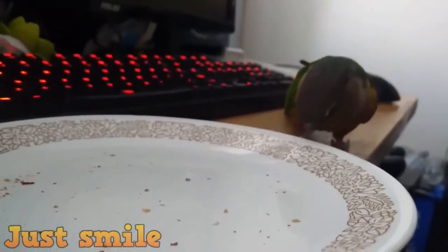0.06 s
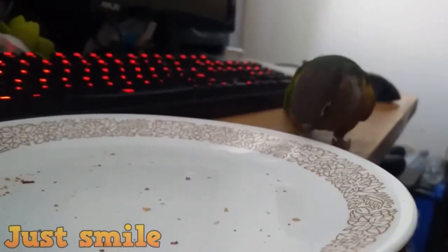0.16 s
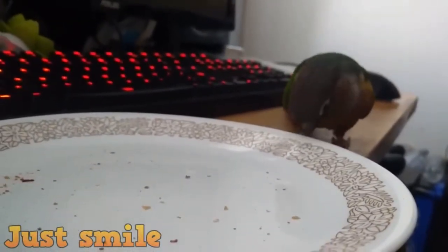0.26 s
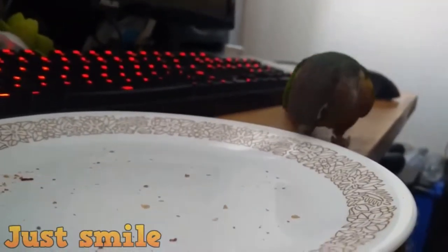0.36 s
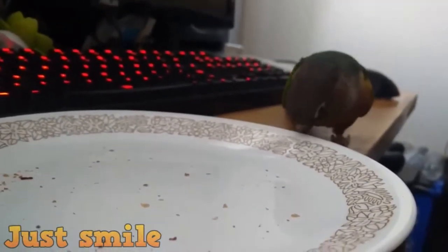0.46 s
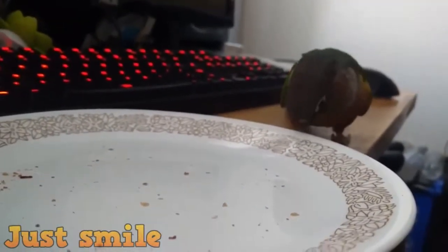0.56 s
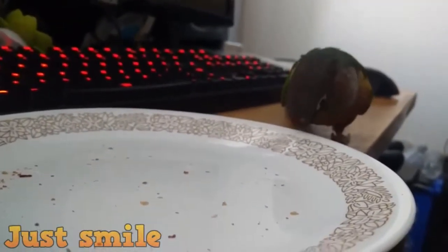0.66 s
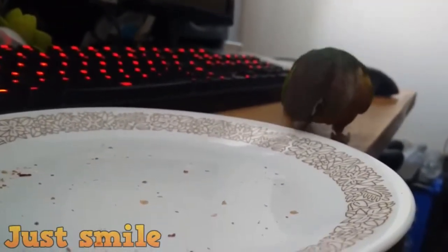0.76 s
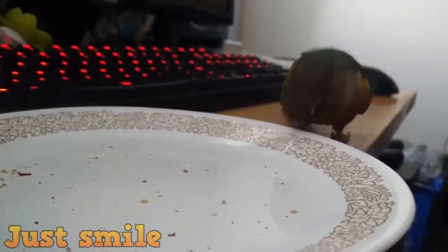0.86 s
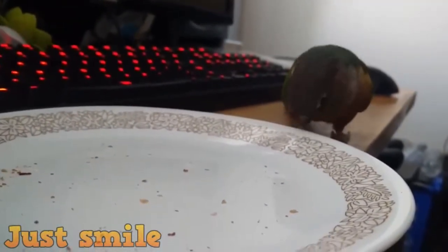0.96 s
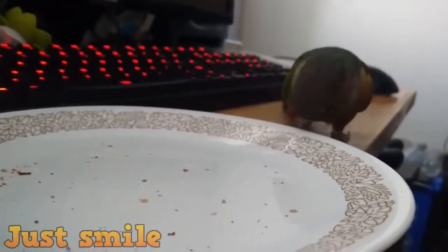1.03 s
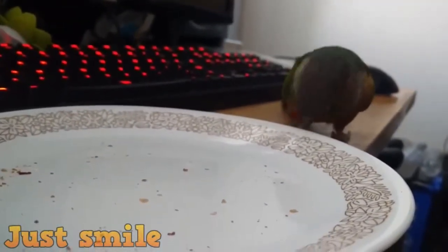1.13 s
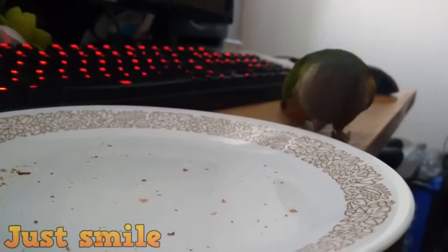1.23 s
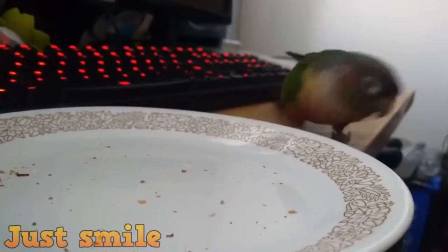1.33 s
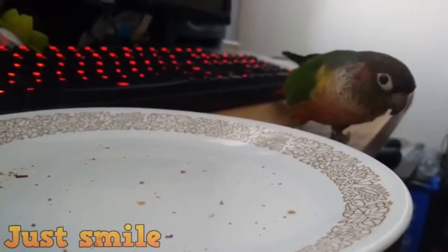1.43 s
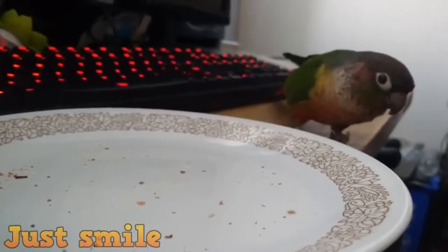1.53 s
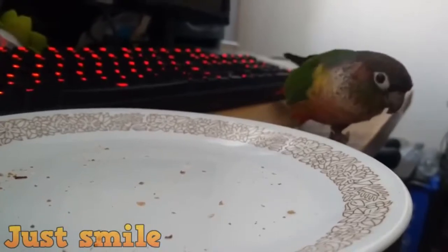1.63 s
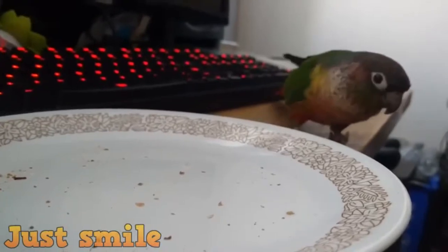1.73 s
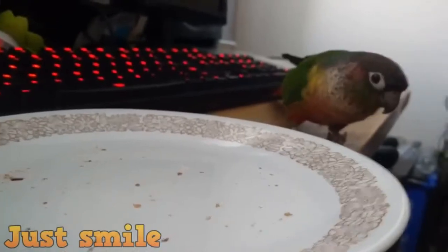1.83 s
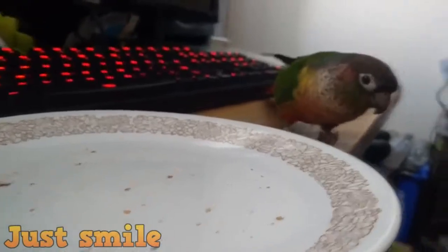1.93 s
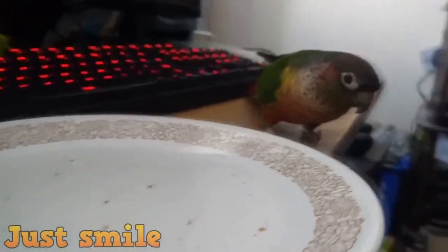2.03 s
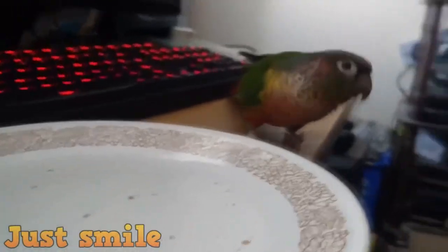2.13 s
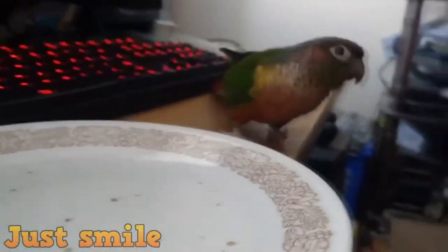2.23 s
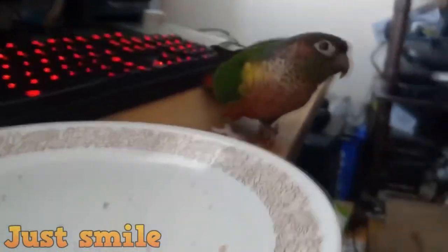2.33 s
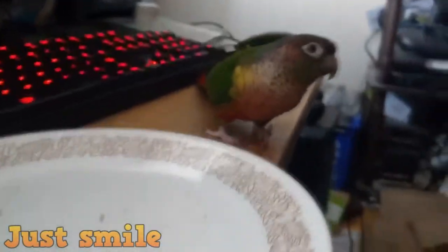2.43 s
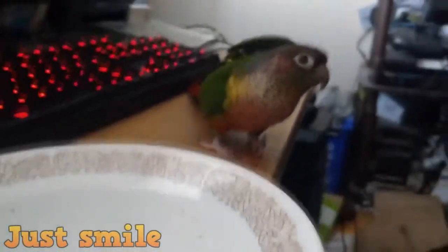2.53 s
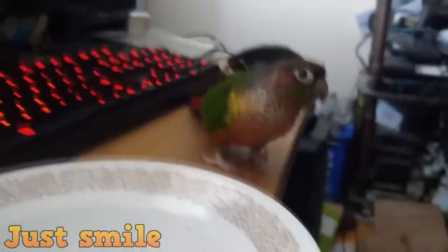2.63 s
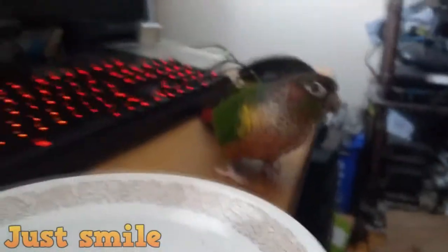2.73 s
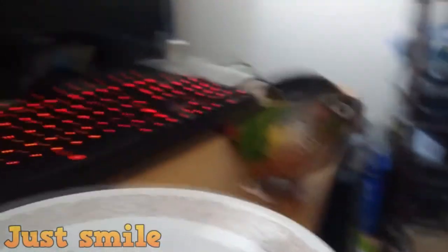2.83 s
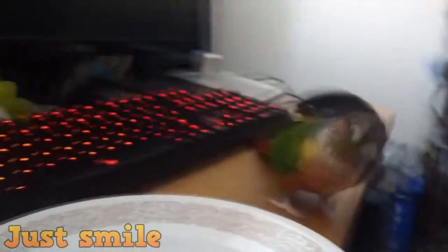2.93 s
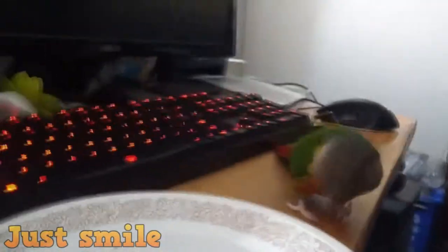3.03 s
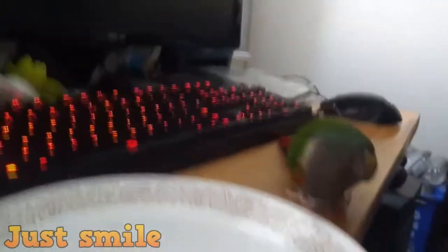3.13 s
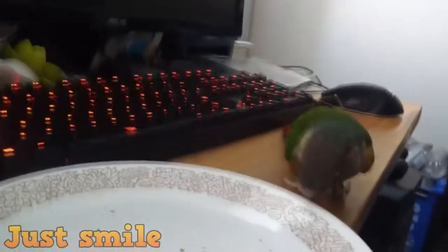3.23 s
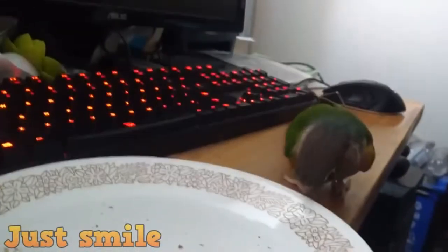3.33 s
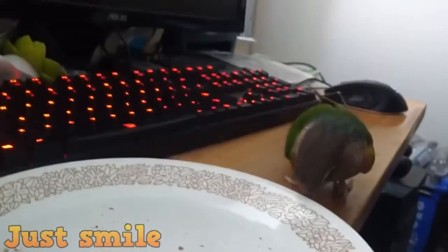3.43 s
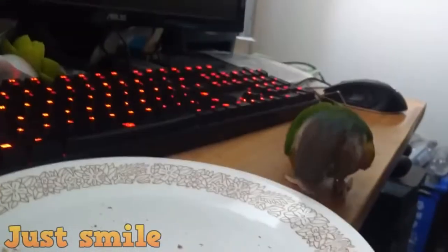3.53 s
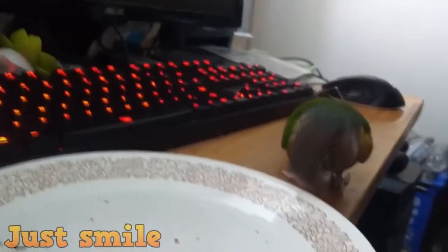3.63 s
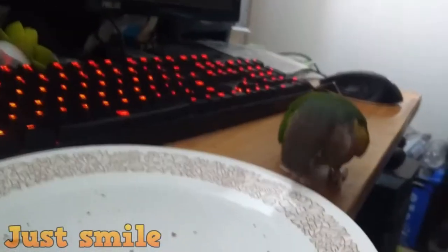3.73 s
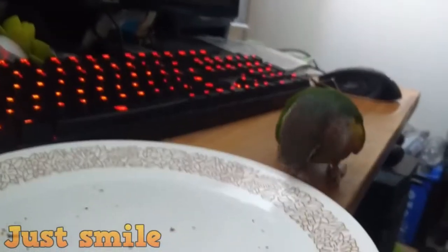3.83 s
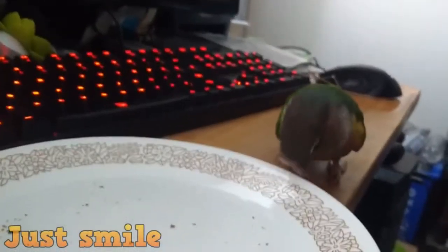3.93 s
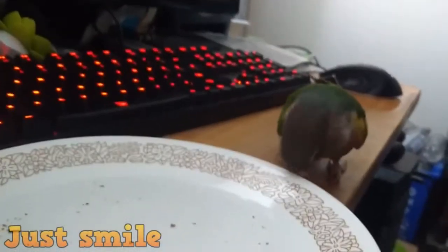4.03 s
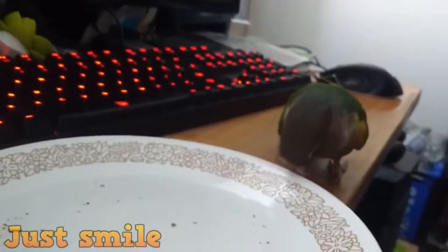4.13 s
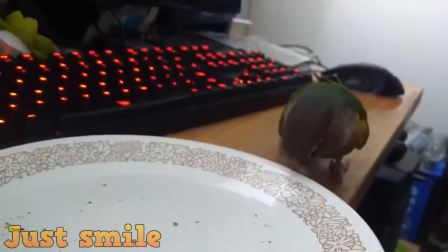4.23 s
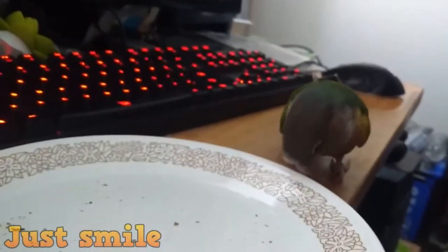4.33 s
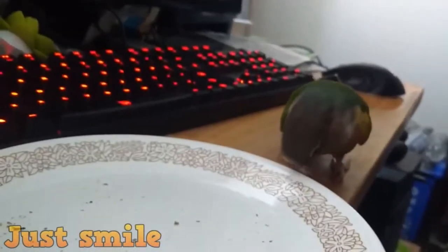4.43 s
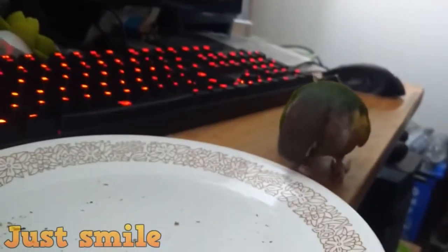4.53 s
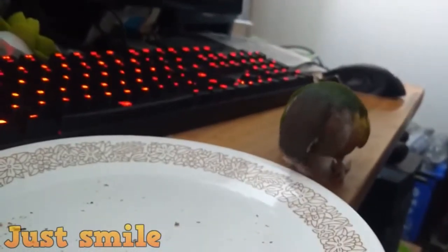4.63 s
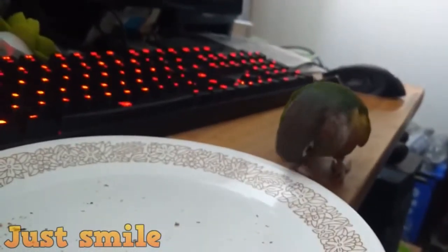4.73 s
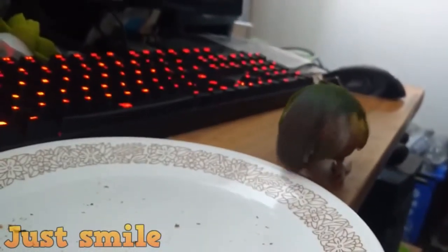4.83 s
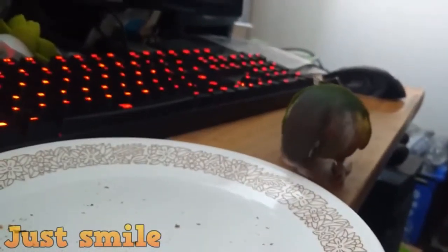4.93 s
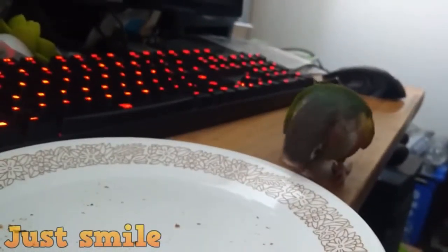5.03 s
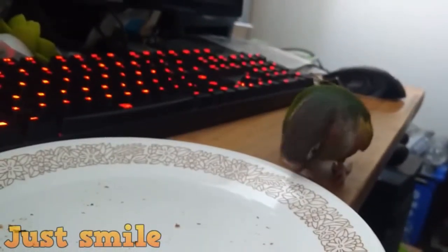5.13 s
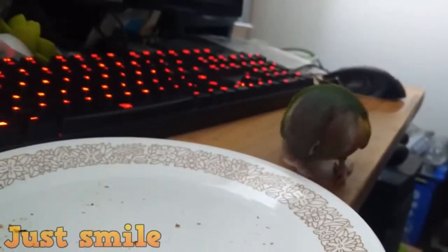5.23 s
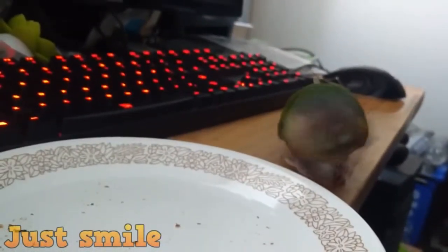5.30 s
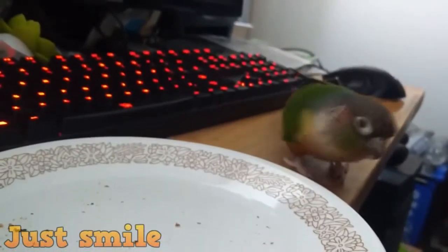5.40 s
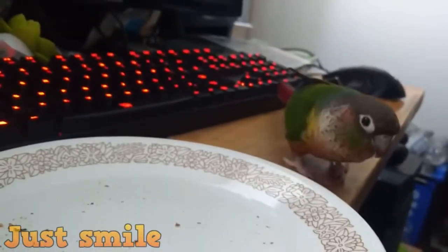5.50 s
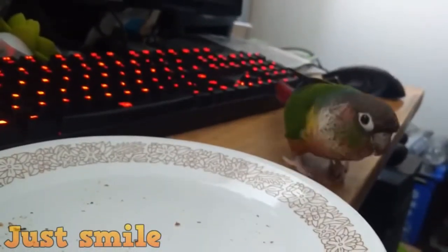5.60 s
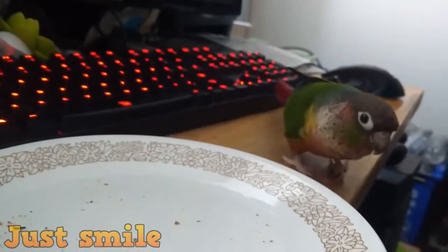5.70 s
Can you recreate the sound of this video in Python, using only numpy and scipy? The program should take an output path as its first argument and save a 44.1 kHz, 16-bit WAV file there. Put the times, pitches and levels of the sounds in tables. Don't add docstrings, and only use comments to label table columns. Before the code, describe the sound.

A small indoor room with computer fans making a steady low hum and soft airy hiss throughout. Close to the phone, a bird's hard beak taps a glazed ceramic plate. The plate is already ringing at 0 s, and about ten taps follow until 1.2 s, roughly eight per second, slightly slowing. Each is a sharp, bright crack with a short dull knock and a high glassy clink; pitch colour and strength vary, and each new tap cuts off the previous ring. After 1.2 s the last ring lingers thin and clear, wavering gently and fading into fan noise until about 3.2 s. A second run of sixteen taps then begins, the first two faint, uneven until about 4 s, then mostly strong and regular, around seven per second, stopping at 5.2 s. The final ring decays over the fans. Loud taps are slightly crushed, briefly ducking the background; room reflections are faint.

```python
import sys
import numpy as np
from scipy import signal
from scipy.io import wavfile
from scipy.ndimage import uniform_filter1d

SR = 44100
rng = np.random.default_rng(int(sys.argv[2]) if len(sys.argv) > 2 else 0)


def master(y):
    cut = np.clip(np.atleast_2d(y).T, -1, 1)
    pcm = np.round(cut * 32767)
    wavfile.write(sys.argv[1], SR, pcm.astype(np.int16))


def ratio_of_db(decibels):
    return 10 ** (np.asarray(decibels, float) / 20)


N = 254016
SECOND_RUN_S = 2.5


def evened(x):
    return x / np.sqrt(np.mean(x ** 2) + 1e-20)


def read_curve(points, hz):
    point_hz, value = np.transpose(points)
    return np.interp(np.log(hz + 1), np.log(point_hz + 1), value)


def smooth(x, seconds):
    r = np.exp(-1 / (seconds * SR))
    return signal.lfilter([1 - r], [1, -r], x)


def coloured(x, points):
    log_gain = np.log(ratio_of_db(read_curve(points, abs(np.fft.fftfreq(2048, 1 / SR)))))
    response = np.conj(np.exp(signal.hilbert(log_gain)))
    impulse = np.fft.ifft(response).real[:1024]
    return signal.oaconvolve(x, impulse)[:N]


# (frequency [Hz], level [dB per Hz])
AIR_COLOUR = [(22, -39), (45, -17.5), (70, 1), (135, -5.5), (160, -11.5), (270, -6), (400, -11), (490, -10),
              (560, -16), (1100, -12.5), (1370, -17.5), (1680, -12.5), (2000, -17), (3300, -17.5),
              (6000, -25), (12000, -33.5), (16000, -34.5)]
# (time [s], level [dB], brightness above 1 kHz [dB per octave])
AIR_COURSE = [(0, 0.5, -0.5), (.7, -0.5, 1), (1.25, 0.5, -0.5), (1.5, 0.5, 0.2), (1.8, 0, 0.1),
              (2.3, -0.5, 0), (2.8, -1.5, -0.46), (3.2, -1.5, 0.25), (4.2, -1, 0.5), (5.2, -1, -0.5),
              (5.45, -3, 0.1), (5.76, -1.5, 0.3)]


def fan_air(patchy_db=0.1, swell_db=0.5):
    size, hop = 2048, 512
    frames, hz = N // hop + 5, np.fft.rfftfreq(size, 1 / SR)
    real, imag, patches = rng.standard_normal((frames, len(hz), 3)).T
    patches = uniform_filter1d(patches, size=20, axis=0)
    patches = evened(uniform_filter1d(patches, size=8, axis=1))
    swell = evened(uniform_filter1d(rng.standard_normal(frames), size=10))

    time_s, _, bright_db = np.transpose(AIR_COURSE)
    octaves = np.log2(np.maximum(hz / 1000, 1))
    tilt_db = octaves[:, None] * np.interp(np.arange(frames) * hop / SR, time_s, bright_db)
    level_db = read_curve(AIR_COLOUR, hz)[:, None] + patchy_db * patches + swell_db * swell + tilt_db
    spectrum = (real + 1j * imag) * ratio_of_db(level_db)
    air = signal.istft(spectrum, nperseg=size, noverlap=size - hop)[1][:N]
    return ratio_of_db(-42.5) * evened(air)


# (frequency [Hz], level [dB], width [Hz])
FAN_TONES = [(83.3, -54, 10), (120.6, -51, 12.8), (258.6, -60.5, 3.9), (427, -63, 6.2), (481, -52.5, 7.1),
             (511.6, -56.5, 9.3), (601, -65.5, 4.9), (765, -64.5, 3.1), (818, -68, 8), (1032, -62, 4),
             (1250, -66, 4), (1516, -65, 3.6), (1616, -59, 16)]


def fan_tones(steady=1.0):
    t = np.arange(N) / SR
    out = np.zeros(N)
    for hz, db, width_hz in FAN_TONES:
        waver = rng.standard_normal(N) + 1j * rng.standard_normal(N)
        waver = smooth(smooth(waver, 0.27 / width_hz), 0.27 / width_hz)
        waver = steady + waver / np.std(waver)
        out += ratio_of_db(db) * evened((waver * np.exp(2j * np.pi * hz * t)).real)
    return out


def fans():
    time_s, level_db, _ = np.transpose(AIR_COURSE)
    return (fan_air() + fan_tones()) * ratio_of_db(np.interp(np.arange(N) / SR, time_s, level_db))


# (frequency [Hz], t60 [s])
ROOM_DECAY = [(300, .2), (1500, 1), (4000, 0.29), (8000, 0.15), (16000, 0.17)]


def room(x):
    spacing = 20
    reflections, at = np.zeros(SR // 2), np.arange(150, SR // 2 - spacing, spacing)
    reflections[at + rng.integers(0, spacing, len(at))] = rng.choice([-1., 1.], len(at))
    hz, t, spectrum = signal.stft(reflections, SR, nperseg=256)
    decay_db = -60 * t / read_curve(ROOM_DECAY, hz)[:, None]
    tail = signal.istft(spectrum * ratio_of_db(decay_db), SR, nperseg=256)[1]
    return signal.fftconvolve(x, tail / np.linalg.norm(tail))[:N]


# (time [s], blow [dB], 1.5 kHz ring [dB], 3 kHz ring [dB], 3.9 kHz ring [dB])
FIRST_TAPS = [(-0.1, 9, 1.5, 7.0, -1.5), (0.0148, 1.5, -1, 7, 8), (0.132, 7.5, 7.5, 1.5, -16),
              (0.249, 6.5, -12, 4, 5.5), (0.3707, 0.0, 4, 2.5, 8), (0.5024, 2.5, 7.5, 2.5, -2),
              (0.6385, 6, -5, 2, 0), (0.7713, 6, -2, -7, 4.5), (0.911, 7, 2, -8.5, -2),
              (1.0496, 8.5, 6.5, 3.5, 5.5), (1.191, 4, 6.5, 15, 4.5)]
SECOND_TAPS = [(3.1657, -12.5, -1.0, -5, 0.5), (3.269, -15, -7.0, -14, 5), (3.3843, -0.5, 4.5, 1, -2),
               (3.5121, -9.5, 1.5, 4.5, 8), (3.634, -1.5, 3.5, -7, 4), (3.7612, 2, 5, -4.0, -11.5),
               (3.9, 5.5, 5.5, -8, 3), (4.0479, -8.5, -10, -2, 16.5), (4.1913, 4.5, 7, -3, 9.5),
               (4.3355, 4.5, 4, -13.5, -15), (4.472, 5, -2.0, -8, 11.5), (4.6146, 6, 3.5, -9, -2),
               (4.7641, 6, 0.5, -7.5, -7), (4.9155, 1, -0.5, -14, 16), (5.0604, 1, -8, -13, 15.5),
               (5.212, 5.5, 2.5, -2.5, -4.5)]
# (level [dB], share of the blow [dB/dB], change in the second run [dB], share of the 3.9 kHz ring [dB/dB])
FOLLOWERS = [
    (-0.5, -.2, -2, -0.26),
    (-2.5, 0.73, 3, 0.16),
    (-1, 1.17, 2, 0.17),
    (-6, 0.59, 5.5, -0.36),
    (10, 0.92, -10.5, -0.26),
    (-15.5, 0.61, 13, 0.055),
    (2, 1.21, -4.5, 0.071),
    (.5, 0.75, -1.5, 0.31),
]


def struck():
    times, blow_db, *rings_db = np.transpose(FIRST_TAPS + SECOND_TAPS)
    second = times > SECOND_RUN_S
    others_db = [db + share * blow_db + later_db * second + lean * rings_db[-1]
                 for db, share, later_db, lean in FOLLOWERS]
    return times, np.transpose([blow_db, *rings_db, *others_db])


# (frequency [Hz], level [dB])
KNOCK_COLOUR = [(120, -20), (350, -16.5), (900, -14.5), (1700, -1.5), (2600, -4.5), (3400, -1),
                (5000, -4.5), (9000, -18.5), (16000, -24)]


def knock(level_db=9.0, echoes=((0.0007, -0.6), (0.0018, 0.5), (0.0031, 0.3))):
    times, levels_db = struck()
    push = np.zeros(N)
    push[np.round(times[1:] * SR).astype(int)] = ratio_of_db(level_db + levels_db[1:, -1])
    thrown_back = sum(share * np.roll(push, round(delay_s * SR)) for delay_s, share in echoes)
    return coloured(push + thrown_back, KNOCK_COLOUR)


# (frequency [Hz], level [dB])
CRACK_COLOUR = [(600, -22), (1500, -6), (3300, 6), (6500, -6), (9000, -8), (12000, -21), (16000, -28)]
# (frequency [Hz], level [dB])
SHIMMER_COLOUR = [(600, -19), (1500, -6), (3300, -4.5), (5400, 4.5), (6700, 4), (9600, -13), (11500, -13),
                  (16000, -13)]


def crack(level_db=-10, t60=0.016, share=0.49, tail_db=-13, tail_t60=0.11):
    length = 4096
    t = np.arange(length) / SR
    decays = ratio_of_db([-60 * t / t60, tail_db - 60 * t / tail_t60])
    rattle_and_shimmer = np.zeros((2, N + length))
    for time_s, blow_db, *_ in (FIRST_TAPS + SECOND_TAPS)[1:]:
        start = round(time_s * SR)
        burst = rng.standard_normal(length) * decays
        rattle_and_shimmer[:, start:start + length] += ratio_of_db(level_db + share * blow_db) * burst
    rattle, shimmer = rattle_and_shimmer
    return coloured(rattle, CRACK_COLOUR) + coloured(shimmer, SHIMMER_COLOUR)


MODES_HZ = [925, 1503, 2177, 2968, 3880, 4920, 5570, 6082, 7366, 7585, 8766, 9640, 10260, 10760, 11280,
            11860, 12670, 13055, 13585, 14385, 15405, 2975, 3890]
# (level [dB], t60 [s], pair level [dB], pair t60 [s], beats [per s])
MODE_RINGS = [(-56.5, 0.17, -48, 0.35, 4), (-73, 0.037, -42, 1.2, 0.79), (-42.5, 0.086, -38.5, 1.3, 2.2),
              (-32.5, 0.031, -32.5, 0.77, 0.71), (-40, 0.071, -33, 0.36, 2.17),
              (-14.5, 0.086, -24, 0.2, 17.8), (-18.5, 0.03, -37, 0.16, 28), (1.5, 0.031, -54, .16, 22),
              (-9.5, 0.038, -39, 0.143, 36), (-18, 0.02, -61, .15, 24), (-13.5, 0.077, -20.5, 0.13, 26),
              (-42, 0.1, -72, .15, 28.1), (-33, 0.09, -42, 0.11, 11), (-40, 0.078, -52, 0.165, 28),
              (-38.5, 0.018, -72, 0.133, 33), (-27, 0.065, -41, 0.16, 22), (-40, .08, -56, 0.12, 23),
              (-32, 0.075, -54, 0.16, 26), (-31, 0.091, -49, 0.14, 16), (-39, .075, -52, 0.11, 28),
              (-37.5, 0.04, -55.5, 0.18, 31), (-10, 0.015, -71, .05, 18), (-30.5, 0.067, -67, .05, 19)]
MODE_FAMILY = [1, 1, 4, 2, 3, 5, 0, 0, 6, 6, 7, 0, 8, 8, 8, 7, 9, 9, 9, 9, 8, 10, 0]


def plate(scatter_db=1.5, rise_s=0.00032, uneven=0.58, drift_s=0.0057, lead_5k_s=0.024,
          flutter=0.58, low_flutter=0.11, flutter_s=0.0053):
    times, levels_db = struck()
    t = np.arange(N) / SR
    tap = np.searchsorted(times, t) - 1
    since = t - times[tap]
    ringing = since < 0.7
    t, tap, since = t[ringing], tap[ringing], since[ringing]

    modes = len(MODE_RINGS)
    chance, drift = rng.standard_normal((2, modes, len(times)))
    run = (times > SECOND_RUN_S) * 1
    lead_s = 0.04 * rng.random((modes, 2))[:, run] + drift_s * drift
    lead_s[MODES_HZ.index(4920)] = lead_5k_s + drift_s * drift[0]

    step_s = 0.001
    wobble_times = np.arange(0, N / SR + 0.01, step_s)
    r = np.exp(-step_s / flutter_s)
    wobble = rng.standard_normal((2, modes, len(wobble_times)))
    wobble = evened(signal.lfilter([1], [1, -2 * r, r * r], wobble))

    rise = 1 - np.exp(-since / rise_s)
    out = np.zeros(N)
    for k, (hz, (db, t60, pair_db, pair_t60, beats)) in enumerate(zip(MODES_HZ, MODE_RINGS)):
        bright = beats > 10
        beat = np.pi * beats * (since + lead_s[k, tap])
        pair = (np.exp(1j * beat) + uneven * np.exp(-1j * beat)) / (1 + uneven)
        depth = flutter if bright else low_flutter
        pair *= 1 + depth * np.interp(t, wobble_times, wobble[0, k] + 1j * wobble[1, k])
        first_ring = ratio_of_db(db - 60 * since / t60)
        scatter = scatter_db * chance[k, tap] * bright
        ring = first_ring + ratio_of_db(pair_db + scatter - 60 * since / pair_t60) * pair
        tone = (np.exp(2j * np.pi * hz * since) * ring).imag
        strength = (-1) ** k * ratio_of_db(levels_db[tap, MODE_FAMILY[k]])
        out[ringing] += rise * strength * tone
    return out


def scene():
    taps = plate() + crack() + knock()
    first = np.arange(N) < SECOND_RUN_S * SR
    reflections = room(taps * first) + room(taps * ~first)
    return (taps + ratio_of_db(-24.5) * reflections + fans())[None]


def top_cut(x):
    return signal.sosfilt(signal.butter(12, 16810, fs=SR, output="sos"), x)


def record(dry):
    power_db = 10 * np.log10(smooth(dry[0] ** 2, 0.0082) + 1e-12)
    fall_db = np.arange(N) * 530.0 / SR
    held_db = np.maximum.accumulate(0.28 * (power_db + 32.5) + fall_db) - fall_db
    ducked = dry / ratio_of_db(smooth(np.maximum(held_db, 0), 0.014))

    ceiling, knee = 0.67, 5
    limited = ducked / (1 + abs(ducked / ceiling) ** knee) ** (1 / knee)

    wide_band = signal.firwin(101, 16300, window=("kaiser", 6), fs=SR)
    narrow_band = signal.firwin(1501, 15770, window=("kaiser", 8), fs=SR)
    wide = signal.oaconvolve(limited, wide_band[None], "same")
    narrow = signal.oaconvolve(limited, narrow_band[None], "same")
    loud = uniform_filter1d(1. * (power_db > -30), size=400)
    return top_cut(narrow + ratio_of_db(-15) * loud * (wide - narrow))


dry = scene()
out = record(dry)
master(out)
```